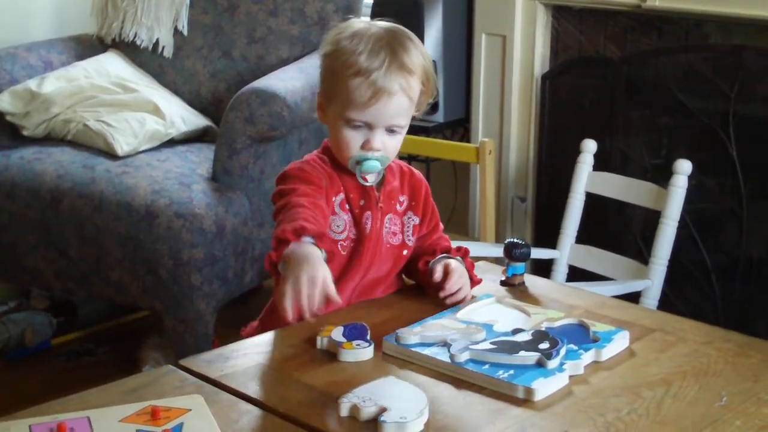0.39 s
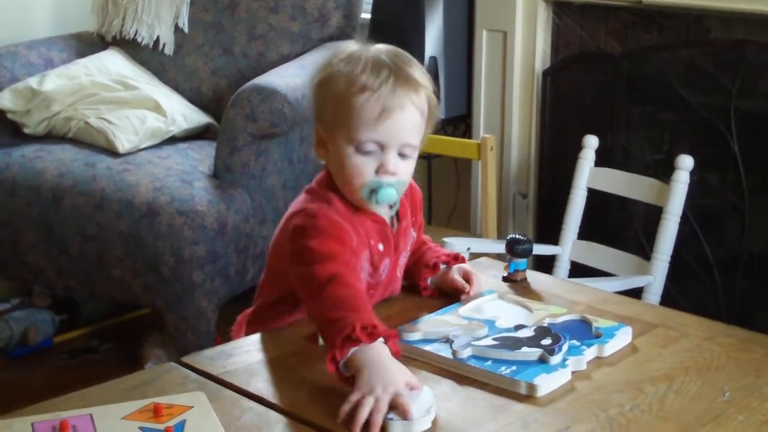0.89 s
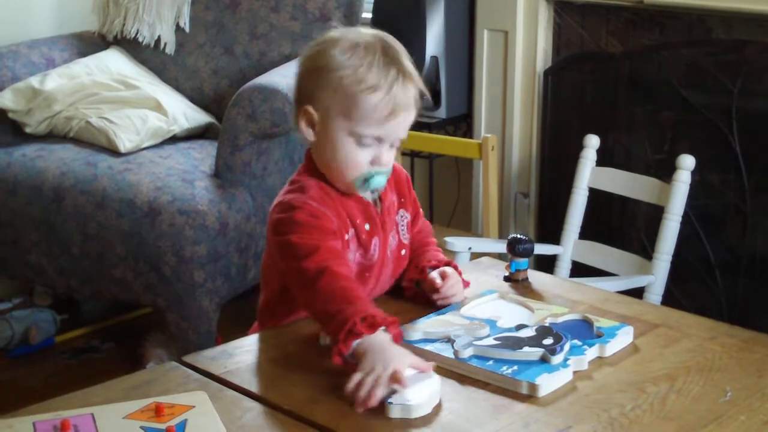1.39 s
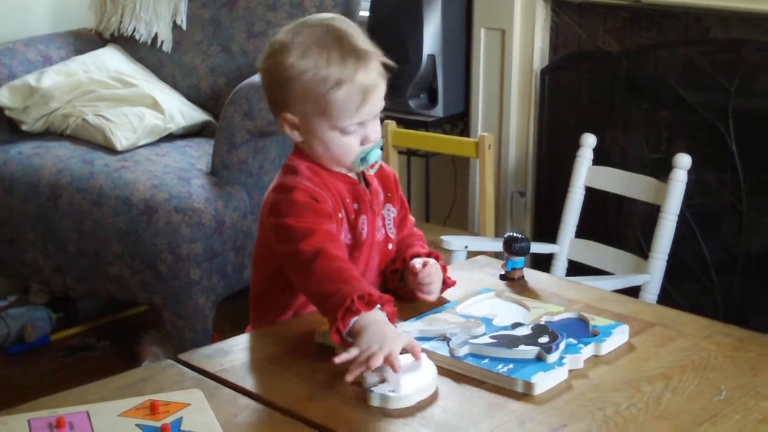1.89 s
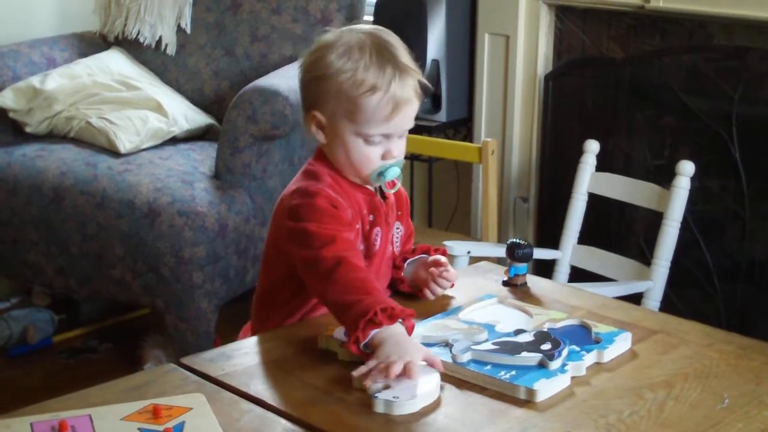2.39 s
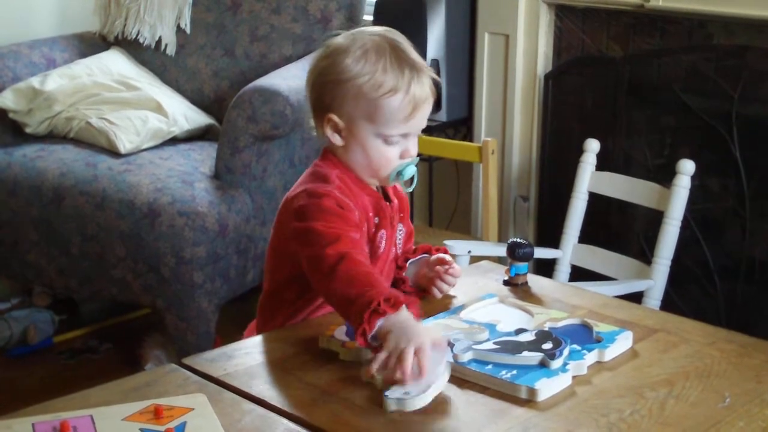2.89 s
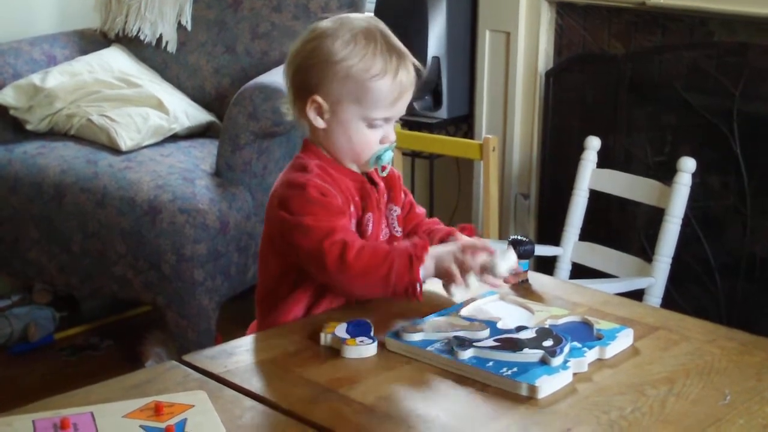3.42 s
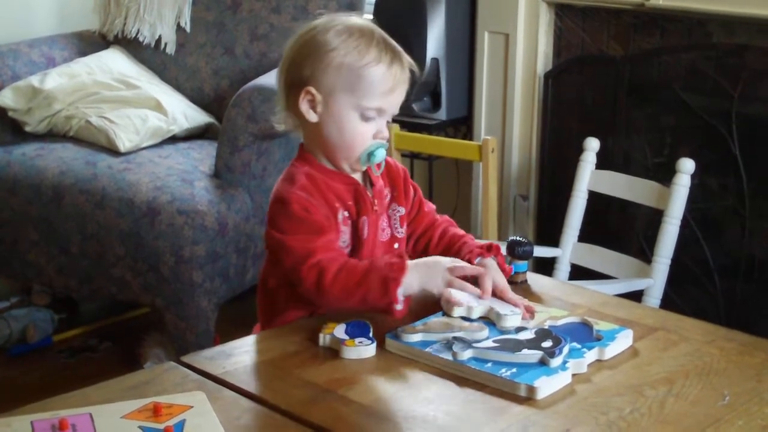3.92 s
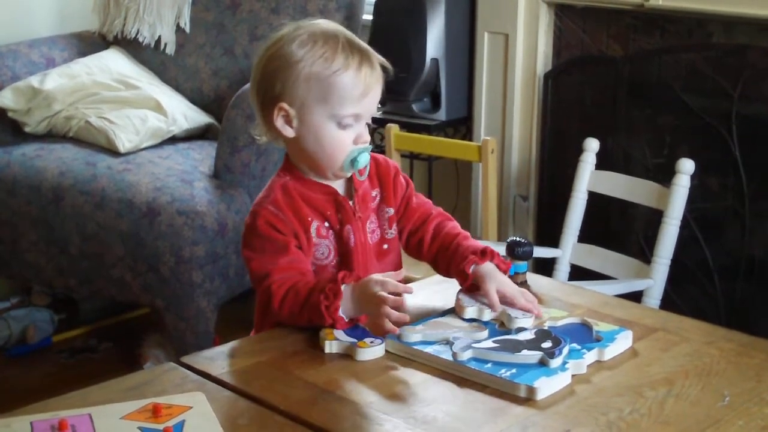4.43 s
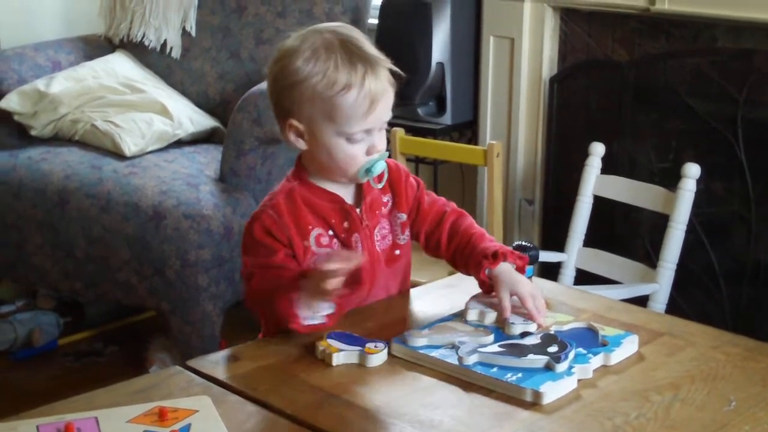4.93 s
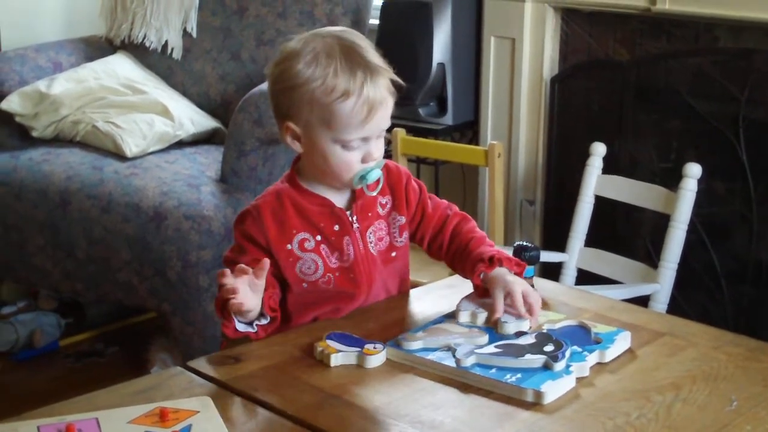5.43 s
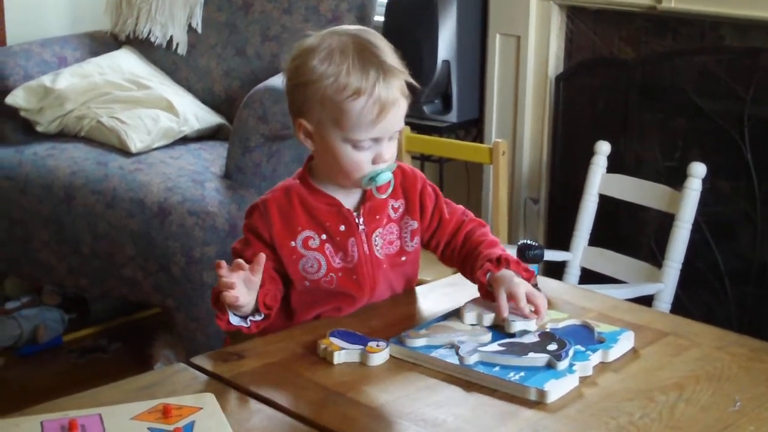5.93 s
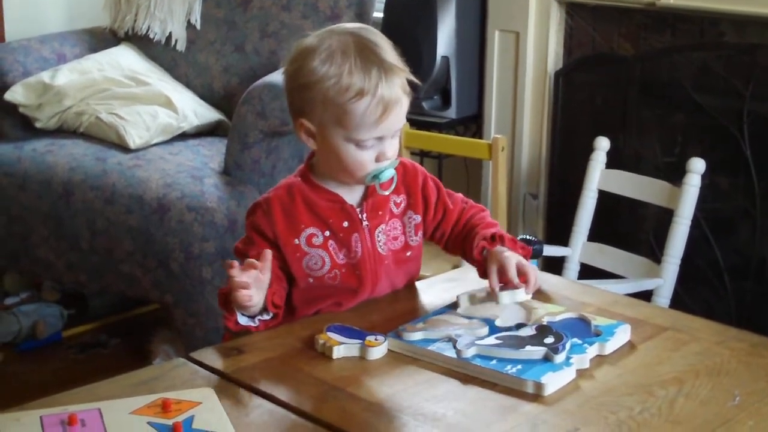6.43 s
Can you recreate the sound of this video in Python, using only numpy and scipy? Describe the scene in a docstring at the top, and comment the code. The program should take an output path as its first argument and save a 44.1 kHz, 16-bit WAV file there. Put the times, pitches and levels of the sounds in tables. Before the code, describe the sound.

A quiet living room with a low rumble that slowly fades, soft hiss, a faint hum and thin, high camera chatter and whine. At about 1.0 s a wooden piece knocks the table with a dull thud. From 1.2 to 1.6 s a hand and sleeve brush the wood and a piece rubs lightly, with a faint tap at 1.3 and a knock at 1.6. A quick clustered knock and short scrape come at 1.8. A tiny motor whirs very faintly around 2.0 to 2.2, and a faint tick follows at 2.5. At 3.6 to 3.7 two hard, bright clacks burst out, the second loudest, with a short room tail. A duller knock lands at 3.9, soft brushing and a thud at 4.3, hollow taps at 4.9 and 5.2, firmer clacks at 5.6 to 5.8, and last knocks at 6.3 and 6.5.

```python
"""Wooden puzzle pieces are set down and knocked on a puzzle board on a wooden table in a living room.
Each knock is a set of clicks that rings decaying modes of wood; deeper thuds ring the same modes.
Pieces slide and hand and sleeve brush the table: swelling strokes of filtered random grains.
Echoes and a short decaying noise tail form the room. Below lie noise with a fading low rumble, a hum,
and the camera's own treble chatter, one brief motor whir and thin whines."""
import sys
import numpy as np
from scipy import signal
from scipy.fft import rfft, irfft
from scipy.io import wavfile

SR = 44100
rng = np.random.default_rng(int(sys.argv[2]) if len(sys.argv) > 2 else 0)


def boost_factor(decibels):
    """Convert a level in decibels to a linear amplitude factor."""
    exponent = np.asarray(decibels, float) / 20
    return 10 ** exponent


def bounce(signal):
    """Save signal as a 16-bit WAV file at the path given by the first command-line argument."""
    frames = np.transpose(np.atleast_2d(signal))
    limited = np.clip(frames, -1, 1)
    pcm = np.round(limited * 32767).astype(np.int16)
    wavfile.write(sys.argv[1], SR, pcm)


N = 289472


def rms_one(x):
    """Scales to rms 1."""
    return x / np.sqrt(np.mean(x ** 2) + 1e-20)


def at_hz(points, hz):
    """Reads a curve of (Hz, value) points, linear over log frequency."""
    points_hz, values = np.transpose(points)
    return np.interp(np.log(hz + 1), np.log(points_hz), values)


def coloured(x, spectrum):
    """Filters x by a gain curve of (Hz, dB) points."""
    gain_db = at_hz(spectrum, np.fft.rfftfreq(N, 1 / SR))
    return irfft(rfft(x) * boost_factor(gain_db), N)


def band(x, low_hz, high_hz):
    """Passes one frequency band."""
    return signal.sosfilt(signal.butter(2, [low_hz, high_hz], "band", fs=SR, output="sos"), x)


def ring(clicks, hz, t60_s):
    """Two-pole resonator: a unit click sets a decaying sine of height 1 ringing."""
    radius = boost_factor(-60 / (t60_s * SR))
    angle = 2 * np.pi * hz / SR
    return signal.lfilter([0, np.sin(angle)], [1, -2 * radius * np.cos(angle), radius ** 2], clicks + 1e-18)


def width_t60(width_hz):
    """Decay time in s of a resonance of the given width."""
    return np.log(1000) / (np.pi * width_hz)


def grains(per_s, spread_db):
    """Random clicks of uneven size and sign."""
    sizes = boost_factor(spread_db * np.minimum(rng.exponential(1, N), 5))
    sizes *= rng.choice([-1, 1], N)
    return sizes * (rng.random(N) < per_s / SR)


def near(hz, centre_hz, octaves):
    """A bell over log pitch, 1 on top."""
    return np.exp(-(np.log2(hz / centre_hz) / octaves) ** 2)


def stroke(peak_s, rise_s, fall_s):
    """Gain of one stroke: swells to 1 at its peak and sinks again."""
    edge_loss_db, curve = 22, 1.4   # loss one rise or fall time from the peak; curve 1 = pointed, 3 = flat-topped
    t = np.arange(N) / SR - peak_s
    away = np.where(t < 0, -t / rise_s, t / fall_s)
    return boost_factor(-edge_loss_db * np.minimum(away, 5) ** curve)


def housing(x, resonances):
    """Parallel resonances of given width, summed; rms 1."""
    return rms_one(sum(boost_factor(db) * rms_one(ring(x, hz, width_t60(width_hz)))
                       for hz, width_hz, db in resonances))


# Room and microphone noise spectrum. Each row: frequency in Hz, relative density in dB per Hz.
AIR_SPECTRUM = [(6, -25), (15, 8), (25, -1.5), (60, -9.5), (134, -17), (200, -15), (270, -17.5), (400, -22),
                (600, -26), (1500, -31.5), (3240, -37.5), (6900, -42.5), (9000, -52), (12200, -46.5),
                (15300, -52.5)]


def air():
    """Two independent noises, for mid and side, shaped by one spectrum."""
    air_db = -47
    return boost_factor(air_db) * rms_one(coloured(rng.standard_normal((2, N)), AIR_SPECTRUM))


def fading_rumble(air_mid):
    """Signal to add to the air so that its lowest band starts raised and slowly dies away."""
    start_db, fade_db_per_s = 6, 1.43
    lowest = coloured(air_mid, [(40, -1.5), (60, -42)])   # (Hz, dB)
    gain = boost_factor(start_db - fade_db_per_s * np.arange(N) / SR)
    return (gain - 1) * lowest


def hum():
    """A wavering low tone: noise twice through one narrow resonance."""
    hz, width_hz, rms_db = 243.6, 20.5, -57
    once = ring(rng.standard_normal(N), hz, width_t60(width_hz))
    return boost_factor(rms_db) * rms_one(ring(once, hz, width_t60(width_hz)))


# Camera whines. Each row: frequency in Hz, level in dB rms.
WHINE_TONES = [(7866.5, -71), (9001, -80), (10002, -78), (10998, -80), (14987, -73)]


def camera_whines():
    """Thin steady sines."""
    t = np.arange(N) / SR
    return sum(np.sqrt(2) * boost_factor(rms_db) * np.sin(2 * np.pi * (hz * t + rng.random()))
               for hz, rms_db in WHINE_TONES)


# Housing resonances under chatter. Each row: frequency in Hz, width in Hz, relative level in dB.
CHATTER_RESONANCES = [(6050, 240, -4.5), (8200, 300, -13), (8676, 430, 4), (10000, 730, 2.5),
                      (10730, 340, -7), (14000, 540, -7)]


def camera_chatter():
    """Uneven ticks at steady rates over a fine grain ring the housing."""
    rms_db = -59
    t = np.arange(N) / SR
    ticks = 0.94 * rms_one(grains(2100, spread_db=2.0))
    for per_s, tick_db in [(65.1, 16.3), (123.4, 16.0), (103.0, 9.5)]:   # (ticks per s, relative dB)
        due = np.diff(np.floor(t * per_s + rng.random()), prepend=0) > 0
        ticks += boost_factor(tick_db + rng.normal(0, 4.5, N)) * due
    clumps = rms_one(band(rng.standard_normal(N), 10.7, 30))
    ticks *= boost_factor(1.8 * clumps)   # uneven bunches
    return boost_factor(rms_db) * housing(ticks, CHATTER_RESONANCES)


# Housing resonances under the motor. Each row: frequency in Hz, width in Hz, relative level in dB.
MOTOR_RESONANCES = [(4400, 41, -5), (5960, 200, -5), (8600, 350, 3), (10100, 600, 3)]


def camera_motor():
    """A small motor whirs briefly: dense grains ring the housing between two ramps."""
    on_s, off_s, start_s, stop_s, level_db = 2.0, 2.24, .012, 0.033, -58
    t = np.arange(N) / SR
    start = (t - on_s) / start_s
    stop = 1 + (off_s - t) / stop_s
    gate = np.clip(np.minimum(start, stop), 0, 1)
    return boost_factor(level_db) * gate * housing(grains(2500, spread_db=0.0), MOTOR_RESONANCES)


# Reverberation. Each row: frequency in Hz, decay time t60 in s.
TAIL_T60 = [(80, 0.47), (250, 0.41), (700, 0.34), (1500, 0.35), (3000, 0.32), (7000, 0.24), (14000, 0.38)]
# Near surfaces. Each row: delay in s, level in dB against the direct sound.
NEAR_ECHOES = [(.0068, -10.5), (.0098, -14), (0.021, -17.5), (.034, -9.5)]


def room(x):
    """A few echoes off near surfaces, then a dense tail that dies band by band; returns mid and side."""
    tail_db, rise_s = -3, 0.0014
    t = np.arange(SR) / SR
    edges_hz = 50 * 2 ** np.arange(0, 8.3, .5)
    white = rng.standard_normal((2, 2, SR))   # neighbouring bands use different noise
    tail = np.zeros((2, SR))
    for k, (low_hz, high_hz) in enumerate(zip(edges_hz, edges_hz[1:])):
        t60_s = at_hz(TAIL_T60, np.sqrt(low_hz * high_hz))
        tail += band(white[k % 2], low_hz, high_hz) * boost_factor(-60 * t / t60_s)
    tail *= 1 - np.exp(-t / rise_s)
    tail *= boost_factor(tail_db) / np.sqrt(np.sum(tail[0] ** 2))
    for delay_s, echo_db in NEAR_ECHOES:
        tail[0, round(delay_s * SR)] += boost_factor(echo_db)
    return signal.fftconvolve(x[None], tail, axes=1)[:, :N]


# Side gain. Each row: frequency in Hz, gain in dB.
SIDE_GAIN = [(10, -11), (30, -7), (100, -16), (300, -32.5), (2000, -17), (8500, -8), (13000, -7)]


def narrow_side(air_side, wet_side):
    """Two ports close together pick up little difference, least near 300 Hz."""
    return coloured(air_side + boost_factor(-10.0) * wet_side, SIDE_GAIN)


# Pieces rubbing over wood. Each row: loudest moment in s, rise in s, fall in s, level in dB,
# rub pitch in Hz at the loudest moment, share of pitched hiss 0-1.
PIECE_RUBS = [(1.33, .12, .14, -56, 2320, .65), (1.78, .09, .04, -57, 1900, .1),
              (1.808, .012, .11, -43, 1800, .3), (4.28, .15, .08, -67, 2150, .5),
              (5.29, .11, .14, -61, 2900, .15), (6.268, .06, .05, -67, 2480, .2)]
# Hand and sleeve on the table. Each row: loudest moment in s, rise in s, fall in s,
# low drag in dB, bright rustle in dB.
HAND_BRUSHES = [(1.22, 0.053, 0.023, -58, -80), (1.34, .09, 0.14, -57, -60.5),
                (1.54, 0.089, 0.095, -54, -57.5), (4.29, 0.24, 0.19, -54, -64.5)]


def slides():
    """Dense stick-slip grains hiss in a band that follows the rub pitch, drag low and rustle in the treble."""
    glide_hz_per_s, rub_drag_db, rub_rustle_db = 2000, 2.5, -13
    t = np.arange(N) / SR
    slips = grains(5000, spread_db=3.0)
    rung = [(hz, rms_one(ring(slips, hz, .012))) for hz in np.geomspace(1700, 3600, 14)]
    broad = rms_one(band(grains(6700, spread_db=5.0), 1200, 4200))
    drag = rms_one(band(grains(2500, spread_db=5.5), 110, 930))
    rustle = rms_one(band(grains(13000, spread_db=8.5), 3600, 10800))
    out = np.zeros(N)
    for peak_s, rise_s, fall_s, rub_db, peak_hz, pitched in PIECE_RUBS:
        rub_hz = np.maximum(peak_hz + glide_hz_per_s * (t - peak_s), 100)
        hiss = sum(near(hz, rub_hz, .11) * sound for hz, sound in rung)
        rub = (1 - pitched) * broad + pitched * hiss
        rub = rub + boost_factor(rub_drag_db) * drag + boost_factor(rub_rustle_db) * rustle
        out += stroke(peak_s, rise_s, fall_s) * boost_factor(rub_db) * rub
    for peak_s, rise_s, fall_s, drag_db, rustle_db in HAND_BRUSHES:
        out += stroke(peak_s, rise_s, fall_s) * (boost_factor(drag_db) * drag + boost_factor(rustle_db) * rustle)
    return out


# Modes of piece, board and table top. Each row: frequency in Hz, relative level in dB, decay time t60 in s.
WOOD_MODES = [(62, 0, .25), (85, -2, .2), (132, 2, .16), (165, 0, .11), (200, 1, .13), (250, 1, .08),
              (385, 3, .09), (460, -2, .03), (550, 0, .04), (680, 0, .04), (820, 0, .02), (970, 0, .022),
              (1150, 0, .012), (1320, 0, .011), (1520, 0, .011), (1820, 0, .009), (2150, 0, .014),
              (2500, 0, .008), (2850, 1, .007), (3300, 1, .005), (3900, 0, .004), (4600, 0, .0035),
              (5400, 0, .003), (6400, 0, .003), (7800, 0, .0025), (10000, -2, .002), (13000, -5, .002),
              (5250, -7, .025)]


def ring_wood(at_s, push):
    """Strikes every mode at each time; push(hz, t60_s) gives the strength per blow."""
    scatter_db = 1.0   # blow-to-blow spread of each mode
    at = np.round(at_s * SR).astype(int)
    out = np.zeros(N)
    for k, (hz, mode_db, t60_s) in enumerate(WOOD_MODES):
        scatter = boost_factor(mode_db + scatter_db * rng.normal(0, 1, len(at)))
        clicks = np.zeros(N)
        np.add.at(clicks, at, push(hz, t60_s) * scatter * (-1) ** k)
        slow = np.exp(-hz / (1.2 * SR))   # the push lasts about a cycle: low modes swell up
        out += ring(signal.lfilter([1 - slow], [1, -slow], clicks), hz, t60_s)
    return out


# The table top gives under hand and piece. Each row: start in s, strength in dB, pitch in Hz,
# hollow note in dB against the pitched part.
TABLE_THUDS = [(.985, -18.5, 129, -21), (1.301, -37.5, 200, 8), (1.571, -22, 156, -20),
               (1.805, -24, 257, -24), (1.819, -19, 62, -31), (3.627, -4, 77, -28), (3.683, -4.5, 167, -14),
               (3.919, -16.5, 177.9, -12), (3.949, -40.5, 191, 14), (4.287, -16.5, 158, -13),
               (4.308, -26.5, 201, -9), (4.9, -16.5, 200, -1), (4.94, -26, 200, -12),
               (5.182, -15, 156.5, -9), (5.228, -17, 78.7, -25), (5.573, -20.5, 199, -22),
               (5.651, -27, 224.2, -7), (5.77, -14, 158, -1.5), (5.865, -20.5, 151, 3),
               (5.938, -26, 177, 6), (6.325, -33.5, 188, 14), (6.516, -25.5, 169, -9)]


def thuds():
    """Each blow favours wood modes near its own low pitch and near one fixed hollow note."""
    hollow_hz, slope_db_per_octave = 385, 18.5
    at_s, strength_db, pitch_hz, hollow_db = np.transpose(TABLE_THUDS)

    def push(hz, t60_s):
        low = boost_factor(-slope_db_per_octave * np.abs(np.log2(hz / pitch_hz)))
        hollow = boost_factor(-slope_db_per_octave * np.abs(np.log2(hz / hollow_hz)))
        treble_loss = 1 + (hz / 700) ** 9.0
        return boost_factor(strength_db) * (low + boost_factor(hollow_db) * hollow) / treble_loss

    return ring_wood(at_s, push)


# Wood on wood. Each row: start in s, strength in dB, favoured pitch in Hz, contact in ms, overtone in Hz.
PIECE_KNOCKS = [(0.975, -8.5, 703, 0.6, 2220), (1.021, -25, 640, 0.98, 2150),
                (1.294, -20.5, 870, 0.65, 2150), (1.566, -8.5, 1022, 0.67, 2730),
                (1.804, -10.5, 1004, 0.42, 1820), (1.81, -10, 1430, 0.27, 1900),
                (1.82, -22.5, 990, 0.52, 2420), (2.481, -25.5, 1080, 0.54, 2460),
                (3.628, 5, 1673, 0.15, 4146), (3.681, 14.5, 1210, 0.33, 1947), (3.916, -6, 512, 0.68, 1820),
                (4.285, -33, 2090, 0.17, 5250), (4.676, -33, 5030, 0.076, 5250),
                (4.896, -16, 980, .44, 5200), (4.905, -7.5, 516, 0.86, 1820),
                (5.183, -14.5, 502, 0.83, 1310), (5.569, 0, 1466, 0.48, 1950), (5.647, -6, 1447, 1, 2800),
                (5.767, 0.5, 897, .4, 5070), (5.775, -29.5, 2500, 0.32, 5200),
                (6.322, -2.5, 2326, 0.52, 5100), (6.328, -9.5, 1003, 0.62, 1300),
                (6.515, -12.5, 880, 0.59, 1800)]


def knocks():
    """Every blow strikes all modes, favours those at two pitches; long contact leaves the high ones out."""
    favoured = .7   # extra strength at the favoured pitch
    overtone_db, overtone_loss_db_per_ms = 8, 33.5   # the softer the contact, the weaker the overtone
    at_s, strength_db, pitch_hz, contact_ms, over_hz = np.transpose(PIECE_KNOCKS)
    over_db = overtone_db - overtone_loss_db_per_ms * contact_ms

    def push(hz, t60_s):
        octaves_below = np.maximum(np.log2(pitch_hz / hz), 0)
        broad = np.sqrt(0.012 / t60_s) * boost_factor(-6 * octaves_below)
        broad /= 1 + (hz * contact_ms / 1000) ** 2.88
        broad /= 1 + (350 / hz) ** 2   # a light piece hardly moves the table's lowest modes
        pitched = favoured * near(hz, pitch_hz, 0.1)
        overtone = boost_factor(over_db) * near(hz, over_hz, 0.12)
        return boost_factor(strength_db) * (broad + pitched + overtone)

    return ring_wood(at_s, push)


def scene():
    """Wood sounds and their room over the steady background, as left and right."""
    wood = thuds() + slides() + knocks()
    wet_mid, wet_side = room(wood)
    air_mid, air_side = air()
    background = air_mid + fading_rumble(air_mid) + hum()
    camera = camera_whines() + camera_chatter() + camera_motor()
    mid = wood + wet_mid + background + camera
    side = narrow_side(air_side, wet_side)
    return np.array([mid + side, mid - side])


def roll_off(x):
    """The treble ends steeply here."""
    return signal.sosfilt(signal.butter(12, 16160, fs=SR, output="sos"), x)


def record(dry):
    """The top is cut, the channels carry opposite standing offsets, peaks past full scale clip."""
    cutoff_hz, offset = 16300, .0643
    x = signal.sosfilt(signal.cheby2(12, 50, cutoff_hz, fs=SR, output="sos"), dry)
    x = x + offset * np.array([[-1], [1]])
    mix = np.clip(x, -1, 1)
    return roll_off(mix)


dry = scene()
out = record(dry)
bounce(out)
```